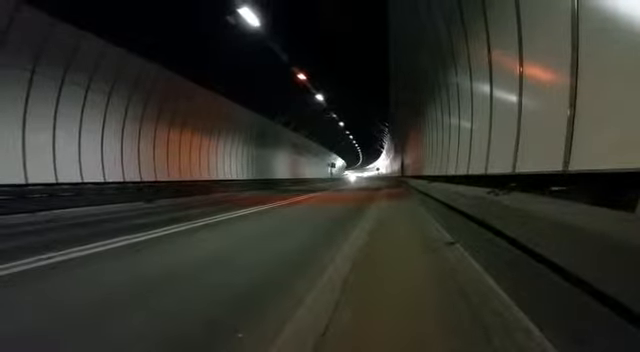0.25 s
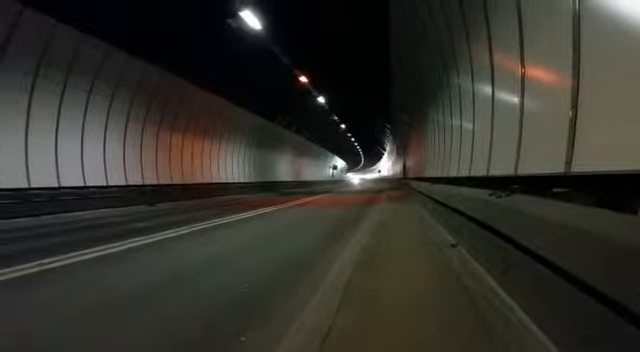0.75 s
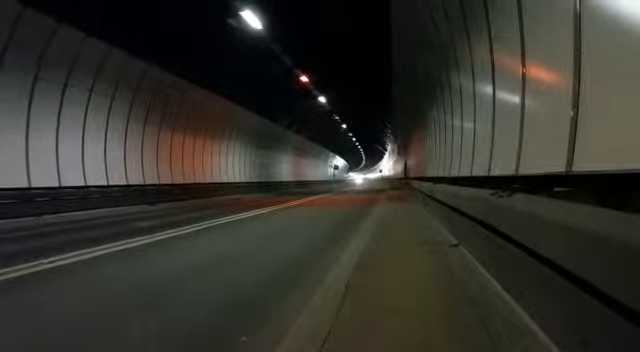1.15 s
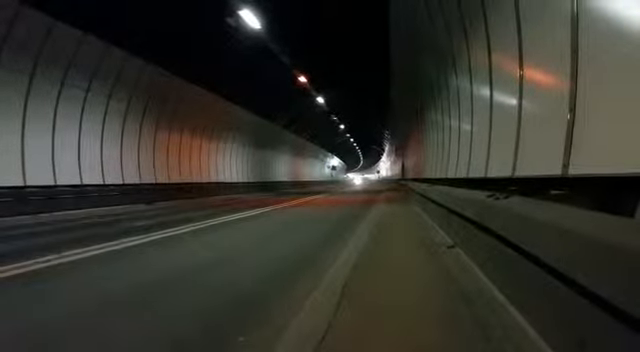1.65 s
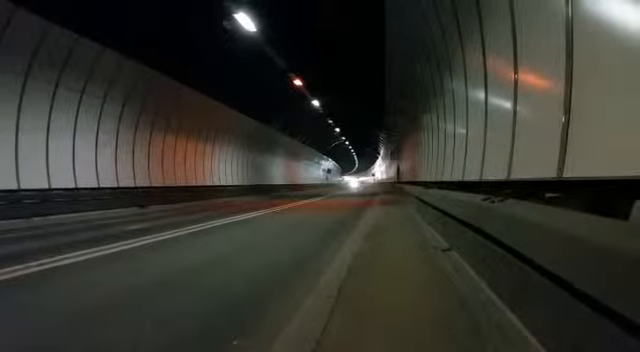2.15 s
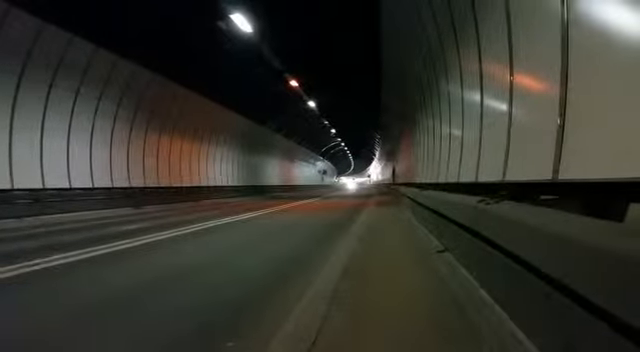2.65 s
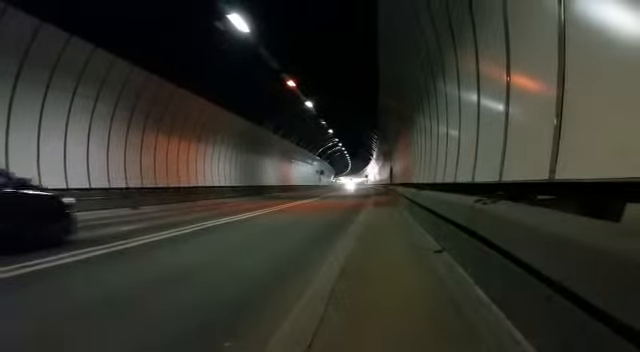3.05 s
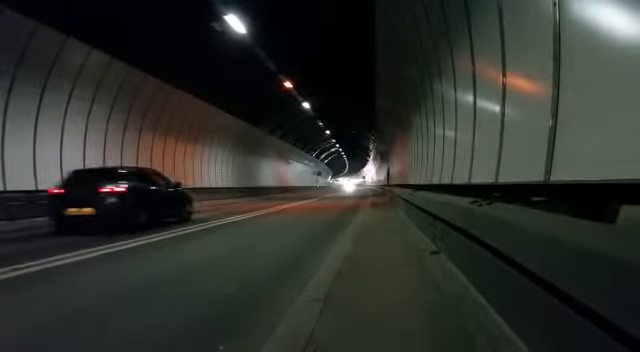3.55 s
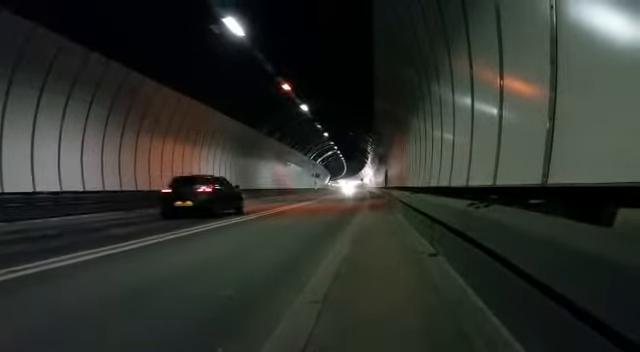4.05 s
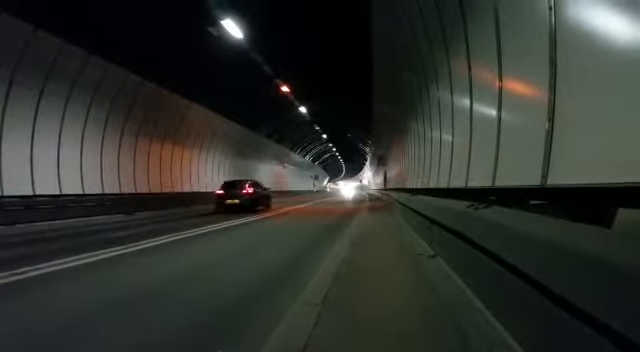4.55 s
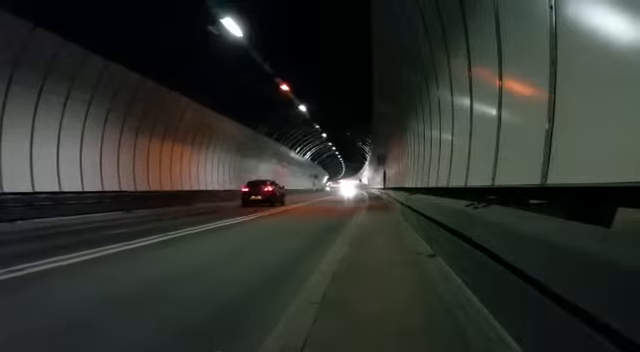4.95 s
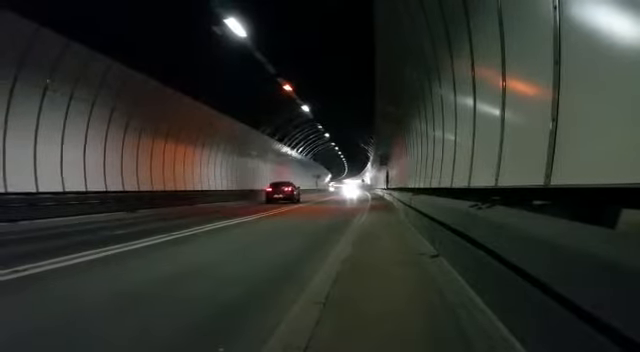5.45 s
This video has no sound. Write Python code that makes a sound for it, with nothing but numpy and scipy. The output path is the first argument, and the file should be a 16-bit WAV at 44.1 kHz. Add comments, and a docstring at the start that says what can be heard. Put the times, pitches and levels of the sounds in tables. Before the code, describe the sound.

Heard from a moving car in an echoing tunnel: a loud, fluttering engine drone leads at first, then broad gritty tyre roar thickens as cars overtake. Deeper exhaust booms come and go underneath, and further engines pull slowly upward in revs. The roar eases after five seconds while the drone stays strong and a rough rasp with bright hiss swells as another car draws level. Stereo microphones, levelled and compressed.

```python
"""Cars accelerating through a tunnel

Place: inside a tiled road tunnel, a stereo microphone pair in a moving car as other cars overtake.
Engines: a hard-driven exhaust drones and throbs with Doppler-spread wall echoes; others boom and climb.
Distance: tyre roar and rumble fill the tube as filtered noise; hiss swells with cars a few metres off.
Exhaust rasp is noise in puffs with a dull echo, gusts are thin hiss; gain control and a limiter follow.
"""
import sys
import numpy as np
from scipy import signal
from scipy.fft import rfft, irfft, next_fast_len
from scipy.io import wavfile
from scipy.ndimage import uniform_filter1d, minimum_filter1d

SR = 44100
rng = np.random.default_rng(int(sys.argv[2]) if len(sys.argv) > 2 else 0)


def wrap_up_sound(samples):
    """Save the sound to the file named by the first command line argument, as 16-bit audio."""
    columns = np.atleast_2d(samples).T
    # keep every value between -1 and 1, then stretch to whole-number steps
    tamed = np.clip(columns, -1, 1)
    steps = np.round(tamed * 32767).astype(np.int16)
    wavfile.write(sys.argv[1], SR, steps)


N = 251811
TIME = np.arange(N) / SR


def from_db(db):
    """Decibels to amplitude gain."""
    return 10 ** (np.asarray(db) / 20)


def rms_one(x):
    """Scale to unit power."""
    return x / np.sqrt(np.mean(np.abs(x) ** 2) + 1e-20)


def in_time(rows):
    """Each column of a curve after the time column, sample by sample."""
    s, *columns = np.transpose(rows)
    return [np.interp(TIME, s, column) for column in columns]


def at_hz(points, hz):
    """Read a spectrum on a log-frequency axis; the end values hold beyond its ends."""
    f, value = np.transpose(points)
    return np.interp(np.log(np.maximum(hz, 1)), np.log(f), value)


def bell(s, half_length):
    """A smooth Gaussian rise and fall of height 1."""
    return np.exp(-((TIME - s) / half_length) ** 2 / 2)


def beating(beats):
    """Level in dB of brief swells and dips, as when wall echoes reinforce or cancel a sound."""
    return sum(db * bell(s, half_length) for s, db, half_length in beats)


# likeness of the two microphones in the tube: f/Hz, correlation (clipped to -1..1 when used)
MIC_LIKENESS = [(60, 1), (170, 0.5), (300, 1.5), (390, 0.6), (560, 0.9), (780, 0.42), (900, 0.43),
                (1150, .08), (1600, -0.3), (2100, 0.24), (3000, 0), (12000, 0)]


def to_pair(mid, side, hz):
    """A diffuse field reaches both microphones alike in the bass, unlike in the treble."""
    alike = np.clip(at_hz(MIC_LIKENESS, hz), -1, 1)
    shared = np.sqrt((1 + alike) / 2) * mid
    opposed = np.sqrt((1 - alike) / 2) * side * np.array([[1], [-1]])
    return shared + opposed


def noise(spectrum):
    """Diffuse stereo noise of a given colour, rms 1."""
    size = next_fast_len(N)
    hz = np.fft.rfftfreq(size, 1 / SR)
    mid, side = rfft(rng.standard_normal((2, size)))
    coloured = to_pair(mid, side, hz) * from_db(at_hz(spectrum, hz))
    return rms_one(irfft(coloured, size)[:, :N])


def scatter(spread_hz):
    """Complex gain of many echoes whose Doppler shifts spread about a tone; rms 1."""
    step, size = 32, 8192   # samples between gain values, number of values
    shift_hz = np.fft.fftfreq(size, step / SR)
    echoes = rng.standard_normal(size) + 1j * rng.standard_normal(size)
    gain = np.fft.ifft(echoes * np.exp(-(shift_hz / spread_hz) ** 2 / 2))
    return rms_one(np.interp(np.arange(N) / step, np.arange(size), gain))


def tunnel_tone(hz, echo_db, doppler):
    """One engine order: the direct tone plus its beating wall echoes; rms 1."""
    centre = hz.mean()
    spread_hz = doppler * centre
    echoes = to_pair(scatter(spread_hz), scatter(spread_hz), centre)
    turn = np.exp(2j * np.pi * (np.cumsum(hz) / SR + rng.random()))
    return rms_one((turn * (1 + from_db(echo_db) * echoes)).real)


# the overtaking, as the tube carries it: t/s at which it starts to build, is full, starts to fade, is gone
OVERTAKE_TIMES = [1.201, 2.902, 4.398, 5.299]


def overtaking(outside_db, during_db, lag_s=0):
    """Level in dB that moves to a new value, holds and returns as the cars go by."""
    presence = np.interp(TIME - lag_s, np.sort(OVERTAKE_TIMES), [0, 1, 1, 0])
    return outside_db + (during_db - outside_db) * presence


# firing rate of the leading exhaust: t/s, f/Hz
DRONE_FIRING = [(0, 257), (0.08, 258), (0.19, 267), (0.27, 257), (0.34, 264), (0.6, 266), (0.77, 258),
                (0.9, 266.5), (1.1, 268), (1.2, 263), (1.4, 264), (1.55, 271), (1.62, 260), (2, 264),
                (2.08, 252), (2.22, 266), (2.33, 255.5), (2.48, 261.5), (2.65, 265.5), (2.8, 273),
                (3, 282.5), (3.15, 281), (3.36, 287), (3.58, 272), (3.77, 279), (3.9, 276), (4.2, 276),
                (4.35, 261), (4.8, 257), (4.95, 270.5), (5.08, 274.5), (5.18, 266), (5.45, 274), (5.6, 266),
                (5.71, 286)]
# its slow level, before the throbs: t/s, level/dB
DRONE_LEVEL = [(0.0, -6), (0.33, -14), (0.55, -1.5), (0.7, -5.5), (1.0, -19), (1.17, -6), (1.35, -16.5),
               (1.6, -17.5), (2.0, -14.0), (2.33, -19), (2.47, -4.5), (2.8, -24.5), (2.97, -11.0),
               (3.3, -24), (3.7, -17.5), (4.15, -24.5), (4.45, -13.5), (4.8, -11), (4.93, -10),
               (5.25, -7.5), (5.45, -10), (5.71, -19)]
# its throbs, where wall echoes reinforce (+) or cancel (-) the tone: t/s, level change/dB, half length/s
DRONE_THROBS = [(0.07, -11, 0.011), (0.131, -4, 0.015), (0.184, -0.5, 0.007), (0.245, 4.5, 0.026),
                (0.337, 7.5, 0.019), (0.434, -1.5, 0.0067), (0.545, -7.5, 0.028), (0.626, 10.0, 0.013),
                (0.633, -18.5, 0.031), (0.739, -15, 0.016), (0.876, -6.5, 0.038), (0.916, 9, 0.0089),
                (0.975, 6.5, 0.007), (1.143, -8.5, 0.023), (1.151, 9.5, 0.011), (1.232, -9, 0.0079),
                (1.28, -5.5, 0.013), (1.394, -21.5, 0.013), (1.439, 4.5, 0.038), (1.653, -18, 0.011),
                (1.694, -12.0, 0.014), (1.755, 12.5, 0.03), (1.795, -11, 0.043), (1.88, -12, 0.0048),
                (1.941, -16, 0.0058), (1.986, -23, 0.012), (2.128, -18.5, 0.013), (2.26, -17, 0.018),
                (2.415, -11.0, 0.029), (2.534, -16.5, 0.027), (2.641, -17, 0.0086), (2.71, 10, 0.017),
                (2.847, 5, 0.015), (2.967, -9, 0.0046), (3.059, -21, 0.0064), (3.187, 11.5, 0.0093),
                (3.301, 12, 0.021), (3.438, 10, 0.03), (3.765, 7.5, 0.0091), (4.007, 13, 0.0077),
                (4.338, 8, 0.012), (4.388, -21, 0.009), (4.608, -7.5, 0.0078), (4.663, -6, 0.008),
                (4.718, -7.5, 0.013), (4.806, -10, 0.007), (4.853, -24, 0.013), (4.905, 1.5, 0.0096),
                (5.008, -10.5, 0.019), (5.093, -4.5, 0.016), (5.157, -7, 0.013), (5.319, -13, 0.02),
                (5.391, -7.5, 0.0083), (5.506, -28, 0.014), (5.561, 5.5, 0.012)]
# its weaker orders: multiple of the firing rate, level relative to one another/dB
WEAKER_ORDERS = [(.75, -8), (1.25, -11), (1.501, -23), (1.75, -3.5), (2, -2.5), (2.25, -9), (2.75, -12),
                 (3.25, -9), (3.749, -15), (4.25, -12.5), (5.25, -12.5)]
CROSS_ECHO_DB = -27   # the drone thrown back by the side walls
ECHO_DIP_SHARE = 0.2   # how far the far echoes sink, in dB per dB, with dips of the drone


def leading_exhaust(firing_hz):
    """A dominant firing tone throbs with its echoes; unequal cylinders add quarter orders, smeared by the tube."""
    level_db, = in_time(DRONE_LEVEL)
    # the crank does not share the quick waver of the beats
    revs_hz = uniform_filter1d(firing_hz, size=SR // 2)
    throb_db = beating(DRONE_THROBS)
    near = from_db(level_db + throb_db) * tunnel_tone(firing_hz, echo_db=-16, doppler=0.083)
    # echoes from ahead and from behind are shifted opposite ways
    shifted = rms_one(sum(tunnel_tone(shift * revs_hz, echo_db=0.0, doppler=0.075)
                          for shift in (.94, 1.05)))
    # echoes from the side walls reach the two microphones in opposite phase
    crosswise = tunnel_tone(revs_hz, echo_db=9.5, doppler=0.09) * np.array([[1], [-1]])
    echoes = from_db(overtaking(-21.5, -23.5)) * shifted + from_db(CROSS_ECHO_DB) * crosswise
    echo_dip = from_db(ECHO_DIP_SHARE * np.minimum(throb_db, 0))
    body = sum(from_db(db) * tunnel_tone(order * revs_hz, echo_db=6, doppler=0.037)
               for order, db in WEAKER_ORDERS)
    body_gain = from_db(-27 + overtaking(0, -8))   # the weaker orders are masked during the overtaking
    return near + echo_dip * echoes + body_gain * body


# low exhaust boom of the nearest car, firing rate: t/s, f/Hz
BOOM_FIRING = [(0, 76.45), (0.3, 78.3), (1.2, 75.9), (2.25, 72), (3.65, 73.8), (3.95, 79), (4.45, 83.5),
               (5.71, 74)]
# its slow level: t/s, level/dB
BOOM_LEVEL = [(0, -32), (0.22, -20.5), (0.42, -37.5), (0.63, -29.5), (0.8, -37.5), (1.2, -28.5),
              (1.65, -27), (2.22, -22.5), (2.45, -34), (2.78, -27.5), (3, -44), (3.48, -52), (3.62, -28.5),
              (3.72, -21), (3.8, -57), (3.9, -43), (4.4, -26.5), (5.03, -38.5), (5.3, -27), (5.5, -30),
              (5.71, -41.5)]
# its throbs: t/s, level change/dB, half length/s
BOOM_THROBS = [(0.979, 5.5, 0.021), (1.451, -5, 0.023), (1.658, 6, 0.023), (1.808, -10, 0.036),
               (1.924, -15, 0.028), (3.891, 16.5, 0.033), (4.532, -8.5, 0.015), (4.912, 7, 0.024)]
# engines pulling up through their revs: loudest at t/s, firing rate then f/Hz, climb/(Hz per s),
# level/dB, half length/s, octave against firing tone level/dB
CLIMBING_ENGINES = [(4.25, 190, 15, -23.5, 0.87, -11.5), (3.1, 220, 12, -24, 0.85, -4),
                    (3.4, 256, 1, -22, 1, -16.5), (3.9, 288, 14, -27.5, 1, -7.5)]
# brief low swells in the tube: t/s, f/Hz, level/dB, half length/s
LOW_SWELLS = [(1.01, 102, -37, 0.11), (1.413, 119, -26.5, 0.039), (1.63, 138.5, -29.5, 0.07),
              (2.251, 150, -29.5, 0.15), (2.55, 109.3, -28, 0.043), (2.694, 165, -24.5, 0.16),
              (4.58, 196.1, -22, 0.1), (5.683, 185, -23.5, 0.06)]


def other_engines():
    """A deep boom close by, engines that swell and fade while their revs rise, and brief low swells."""
    boom_hz, = in_time(BOOM_FIRING)
    boom_db, = in_time(BOOM_LEVEL)
    boom_gain = from_db(boom_db + beating(BOOM_THROBS))
    out = boom_gain * tunnel_tone(boom_hz, echo_db=-11, doppler=0.16)
    for s, peak_hz, hz_per_s, level_db, half_length, octave_db in CLIMBING_ENGINES:
        hz = peak_hz + hz_per_s * (TIME - s)
        firing = tunnel_tone(hz, echo_db=-1, doppler=0.065)
        octave = tunnel_tone(2 * hz, echo_db=3, doppler=0.024)
        out += from_db(level_db) * bell(s, half_length) * (firing + from_db(octave_db) * octave)
    for s, hz, level_db, half_length in LOW_SWELLS:
        tone = tunnel_tone(np.full(N, hz), echo_db=3, doppler=0.2)
        out += from_db(level_db) * bell(s, half_length) * tone
    return out


# low rumble of the tube, spectrum: f/Hz, relative level/dB
RUMBLE_SPECTRUM = [(10, -62), (25, -33.5), (40, -23.5), (56, 10.5), (100, 7.5), (130, 5), (165, 13),
                   (210, 21.5), (290, 17), (350, 1.5), (500, -51.5)]
# tyre roar in the tube, spectrum: f/Hz, relative level/dB
ROAR_SPECTRUM = [(200, -9.5), (340, -5), (450, 0.5), (570, 4.5), (670, -0.5), (850, 2), (1150, 0.5),
                 (1500, -5), (2000, -10), (2800, -18.5), (4000, -27.5), (6000, -90)]
# the roar surges (+) and sags (-): t/s, level change/dB, half length/s
TYRE_SURGES = [(.48, -2.5, 0.18), (1.65, 2.5, 0.036), (1.83, 1, 0.028), (2.17, -1, 0.098),
               (2.55, 1.5, 0.079), (2.83, 0.5, 0.027), (3.04, 0.5, 0.036), (4.2, 1.5, 0.087),
               (4.43, 2, 0.023), (5.52, 2.5, .03), (5.63, 2.5, 0.038)]
ROAR_LAG_S = 0.26   # the roar of the tyres follows the low rumble


def road():
    """Rumble and tyre roar build up in the tube with the overtaking; the roar is gritty from the asphalt."""
    grit_db = 1.08 * scatter(spread_hz=23).real   # fast unevenness
    roar_db = overtaking(-24.5, -19.5, ROAR_LAG_S) + beating(TYRE_SURGES) + grit_db
    rumble = from_db(overtaking(-25.5, -22)) * noise(RUMBLE_SPECTRUM)
    return rumble + from_db(roar_db) * noise(ROAR_SPECTRUM)


# exhaust rasp: t/s, level/dB
RASP_LEVEL = [(0, -34.5), (.5, -38), (.63, -35), (.74, -32), (.85, -33), (.96, -30), (1.1, -35), (1.3, -38),
              (1.5, -52), (2.2, -51), (2.8, -37), (3.6, -39.5), (4.4, -33), (5.06, -27), (5.22, -30.5),
              (5.36, -29), (5.45, -32), (5.5, -23.5), (5.57, -29.5), (5.71, -24)]
# its spectrum: f/Hz, relative level/dB
RASP_SPECTRUM = [(900, -11.5), (1500, 8.5), (2100, 4.5), (2750, 3), (3400, -1.5), (4300, -3.5), (4800, -16),
                 (5400, -20.5), (5900, -27), (6600, -52), (9000, -69.5)]
# spectrum of the rasp returning down the tube: f/Hz, relative level/dB
RASP_ECHO_SPECTRUM = [(700, -12.5), (1400, 2.5), (2300, -1.5), (3000, -12.5), (4000, -27), (6000, -69)]
RASP_ECHO_LAG_S, RASP_ECHO_DB = 0.52, -3   # delay, level against the rasp


def rasp(firing_hz, depth=0.17):
    """Exhaust gas hisses in puffs, one per engine cycle with wandering phase; a duller echo lingers."""
    rasp_db, = in_time(RASP_LEVEL)
    cycle = 2 * np.pi * np.cumsum(firing_hz / 4) / SR   # four firings to a cycle
    puffs = 1 + depth * np.cos(cycle + np.angle(scatter(25)))
    echo_db = np.interp(TIME - RASP_ECHO_LAG_S, TIME, rasp_db) + RASP_ECHO_DB
    direct = from_db(rasp_db) * puffs * noise(RASP_SPECTRUM)
    return direct + from_db(echo_db) * noise(RASP_ECHO_SPECTRUM)


def nearness(s, distance_m):
    """Gain of a passing source: 1 / range, scaled to 1 at its closest."""
    speed_m_per_s = 6   # overtaking cars, relative to the listener
    return distance_m / np.hypot(distance_m, speed_m_per_s * (TIME - s))


# cars drawing level: closest at t/s, distance/m, tyre hiss level/dB, air hiss level/dB
CLOSE_PASSES = [(2.76, 3.0, -58, -56), (5.62, 1.9, -32.5, -73.5)]
# tyre hiss, spectrum: f/Hz, relative level/dB
TYRE_HISS_SPECTRUM = [(2000, -15.5), (3600, 17.5), (4400, 18), (5000, 11.5), (5400, 8), (6000, 1),
                      (6900, -2.5), (8000, -7), (9300, -16.5), (11000, -26), (15000, -46)]
# streaming air, spectrum: f/Hz, relative level/dB
AIR_SPECTRUM = [(3000, -6), (5000, 10), (7000, 14), (8300, 12.5), (9300, 4), (11000, 1), (13500, -11),
                (15500, -10.5)]
TYRE_LAG_S = 0.073   # the tyre hiss peaks after the air that the nose pushes
TYRE_FAR_DB, AIR_FAR_DB, AIR_FAR_CUT_HZ = -80, -76, 12000   # constant beds; the air's low-pass
HISS_SURGE_SHARE = 0.46   # how far the tyre hiss follows the surges of the roar, in dB per dB


def hisses(tyre_falloff=0.98, air_falloff=1.4):
    """Tyres and streaming air hiss, swelling as cars draw level; the air fades more steeply with range."""
    tyre, air = from_db(TYRE_FAR_DB), 0
    for s, distance_m, tyre_db, air_db in CLOSE_PASSES:
        tyre_gain = from_db(tyre_db) * nearness(s + TYRE_LAG_S, distance_m) ** tyre_falloff
        air_gain = from_db(air_db) * nearness(s, distance_m) ** air_falloff
        tyre, air = np.hypot(tyre, tyre_gain), np.hypot(air, air_gain)   # powers add
    low_pass = signal.butter(4, AIR_FAR_CUT_HZ, fs=SR, output="sos")
    far_air = signal.sosfilt(low_pass, noise(AIR_SPECTRUM))
    flutter = from_db(.8 * scatter(45).real)
    surge = from_db(HISS_SURGE_SHARE * beating(TYRE_SURGES))
    near = surge * tyre * noise(TYRE_HISS_SPECTRUM) + air * noise(AIR_SPECTRUM)
    return flutter * (near + from_db(AIR_FAR_DB) * far_air)


# gusts of air: peak at t/s, level/dB, rise/s, decay/s
AIR_GUSTS = [(0.27, -70.5, .4, .35), (2.26, -60, .07, .33), (4.17, -69.5, 0.22, 0.17),
             (5.02, -70, .06, .06)]
# their spectrum: f/Hz, relative level/dB
GUST_SPECTRUM = [(4500, -22.5), (6000, 0), (8300, 2), (10500, -1.5), (12000, -10.5), (15500, -11)]


def gusts():
    """Air pushed by the cars: each gust is a thin hiss with a straight rise and an exponential decay."""
    envelope = 0
    for s, level_db, rise_s, decay_s in AIR_GUSTS:
        rise = np.clip((TIME - s) / rise_s + 1, 0, 1)
        decay = np.exp(-np.maximum(TIME - s, 0) / decay_s)
        envelope = envelope + from_db(level_db) * rise * decay
    return envelope * noise(GUST_SPECTRUM)


def scene():
    """Engines, road and air inside the tunnel."""
    firing_hz, = in_time(DRONE_FIRING)
    engines = leading_exhaust(firing_hz) + other_engines()
    return engines + road() + rasp(firing_hz) + hisses() + gusts()


def gain_control(x, threshold_db=-11, share=0.5, window_s=0.035, makeup_db=1.17):
    """Turns everything down by a share of the dB by which short-term power exceeds a threshold."""
    power = uniform_filter1d(np.mean(x ** 2, axis=0), size=int(window_s * SR))
    over_db = np.maximum(10 * np.log10(np.abs(power) + 1e-12) - threshold_db, 0)
    return x * from_db(makeup_db - np.clip(share, 0, 1) * uniform_filter1d(over_db, size=400))


def limiter(x):
    """Looks a little ahead and ducks the whole sound under each peak."""
    ceiling_db, release_db_per_s = -.6, 160
    over = np.maximum(20 * np.log10(np.abs(x).max(axis=0) + 1e-9) - ceiling_db, 0)
    release_db = release_db_per_s * TIME
    held = np.maximum.accumulate(over + release_db) - release_db
    gain_db = minimum_filter1d(-held, size=300)
    smooth_db = uniform_filter1d(uniform_filter1d(gain_db, size=200), size=200)
    return x * from_db(smooth_db)


# colour of the microphone pair: f/Hz, left minus right level/dB
MIC_BALANCE = [(60, 1), (260, 2), (550, 2.5), (1100, 1.5), (1800, 2), (2700, 1.5), (3400, -2.5),
               (4300, -7.5), (4900, 0.5), (5450, -3), (6100, -10), (8200, -14.5), (10000, -1.5),
               (13000, -5.5)]
CUTOFF_HZ = 16200   # stop-band edge of the top cut


def record(dry):
    """Each microphone port has its own colour; then a low cut, gain control, the limiter and the top cut."""
    size = next_fast_len(N + SR // 10)
    tilt_db = at_hz(MIC_BALANCE, np.fft.rfftfreq(size, 1 / SR)) * np.array([[.5], [-.5]])
    ports = from_db(tilt_db) / np.sqrt(np.mean(from_db(tilt_db) ** 2, axis=0))   # keeps the mean power
    heard = irfft(rfft(dry, size) * ports, size)[:, :N]
    heard = signal.sosfilt(signal.butter(2, 36, "high", fs=SR, output="sos"), heard)
    limited = limiter(gain_control(heard))
    return signal.sosfilt(signal.cheby2(12, 70, CUTOFF_HZ, fs=SR, output="sos"), limited)


dry = scene()
out = record(dry)
wrap_up_sound(out)
```